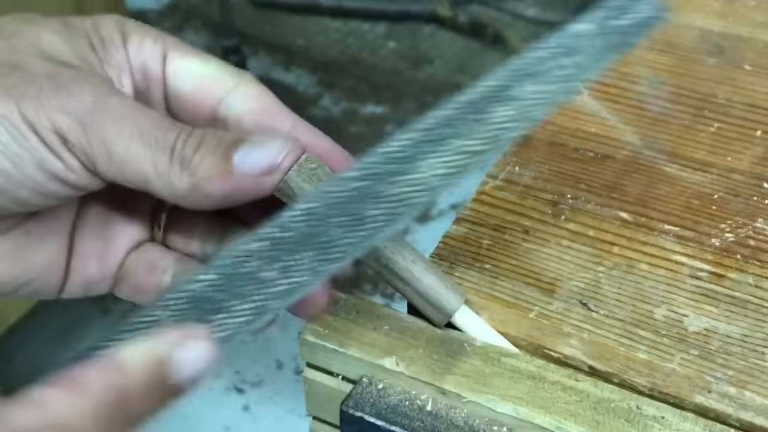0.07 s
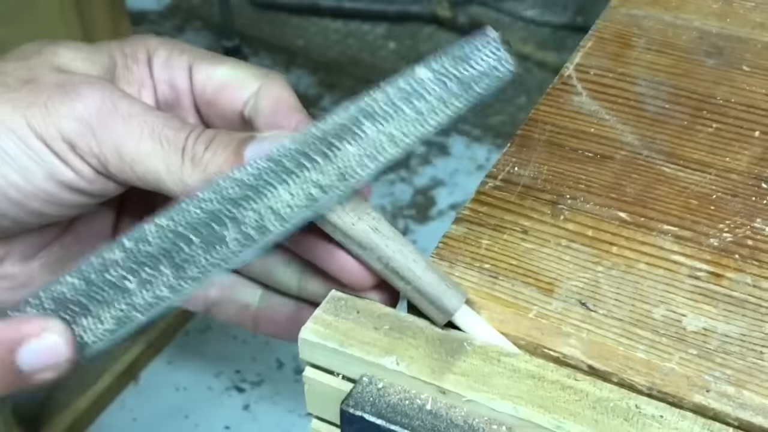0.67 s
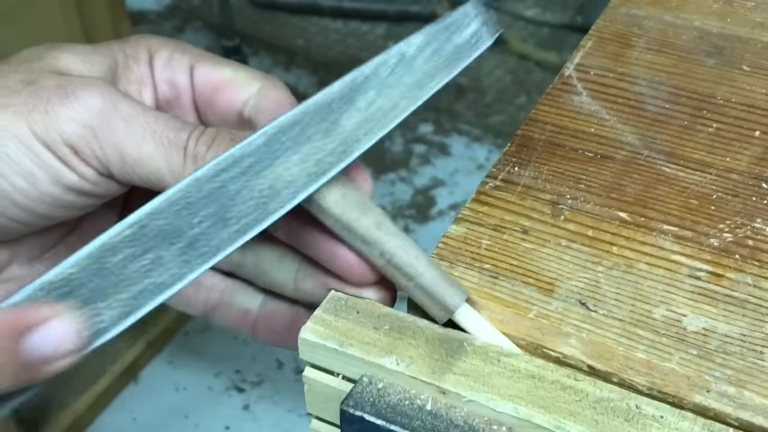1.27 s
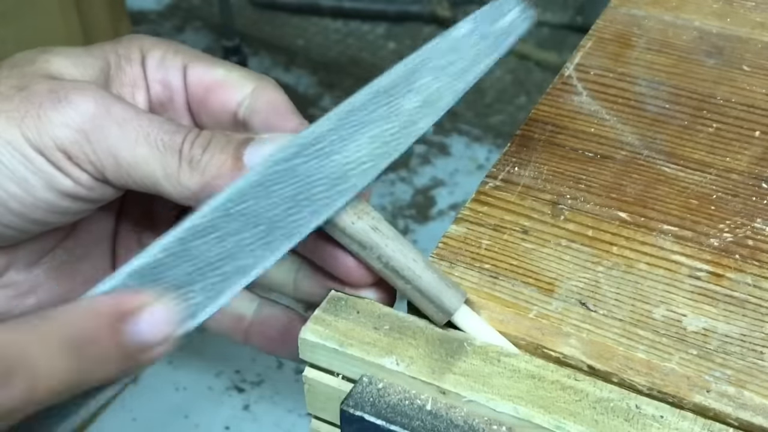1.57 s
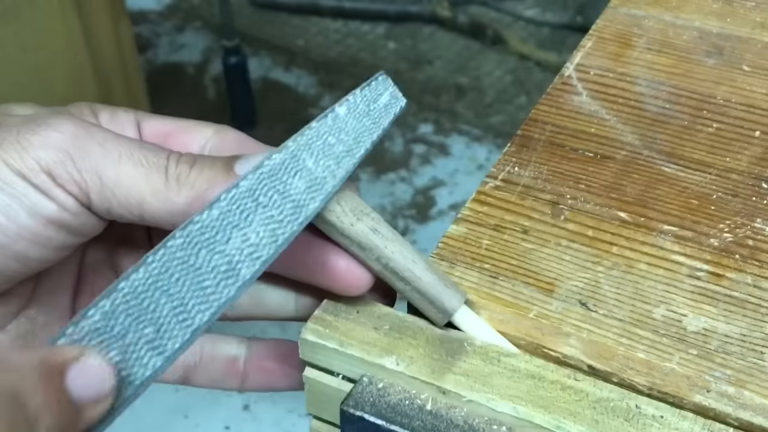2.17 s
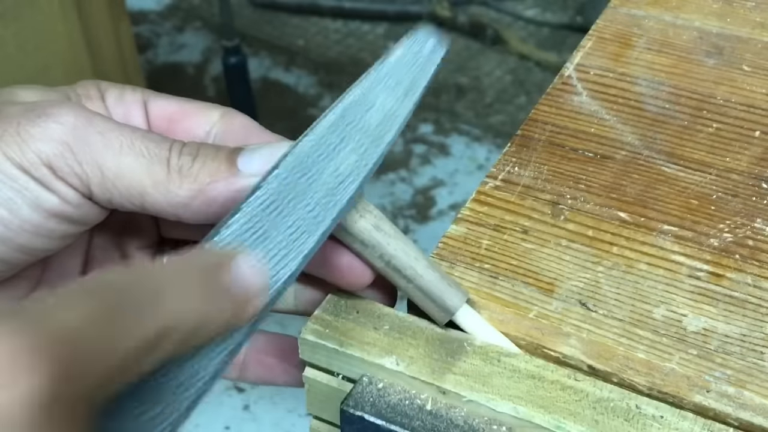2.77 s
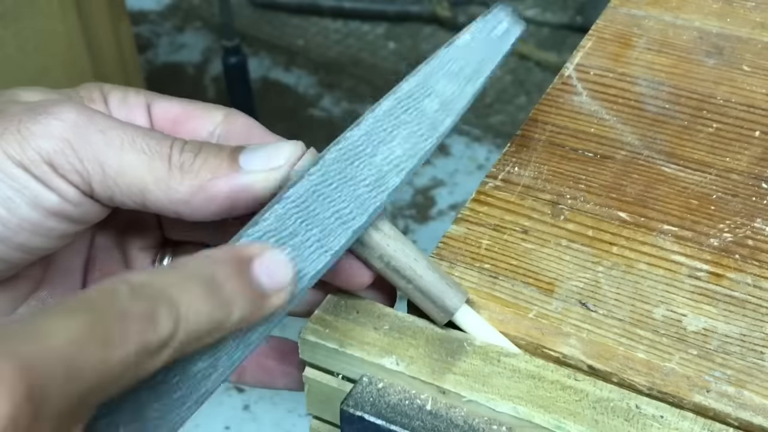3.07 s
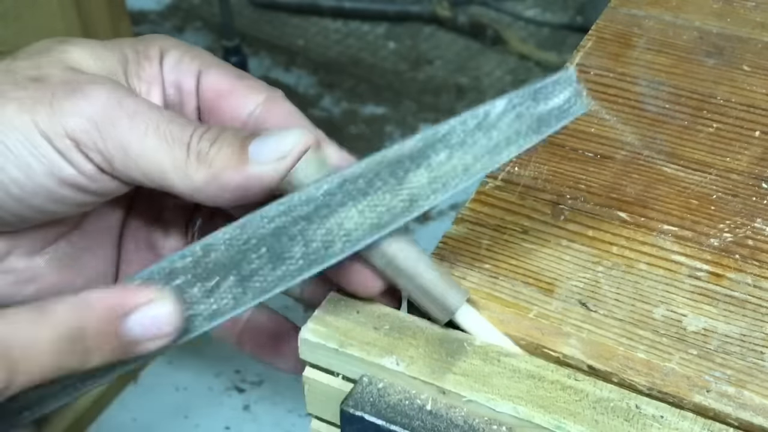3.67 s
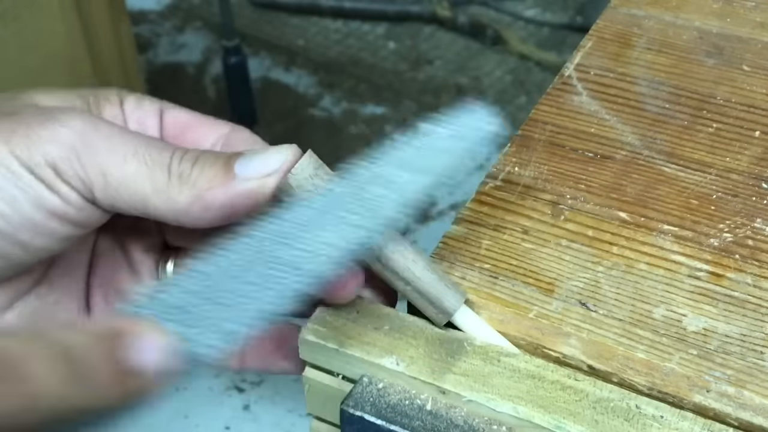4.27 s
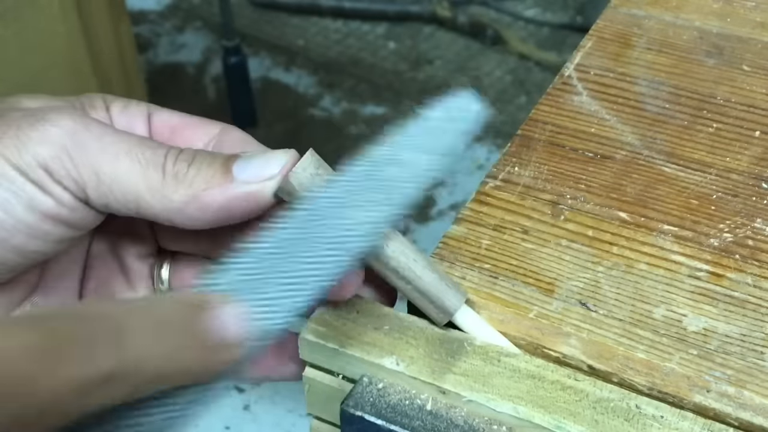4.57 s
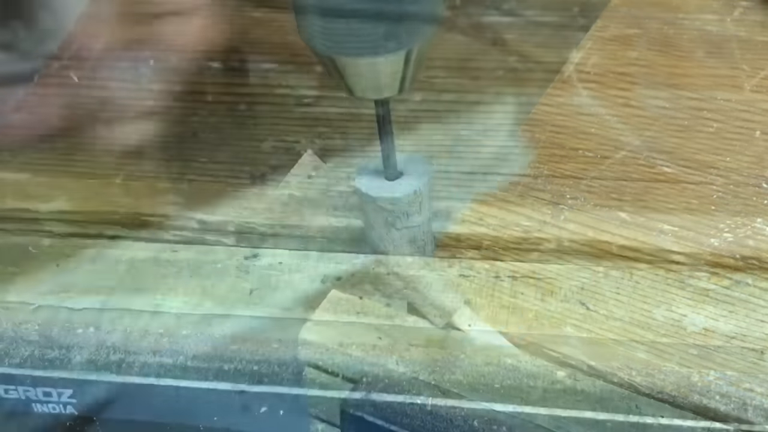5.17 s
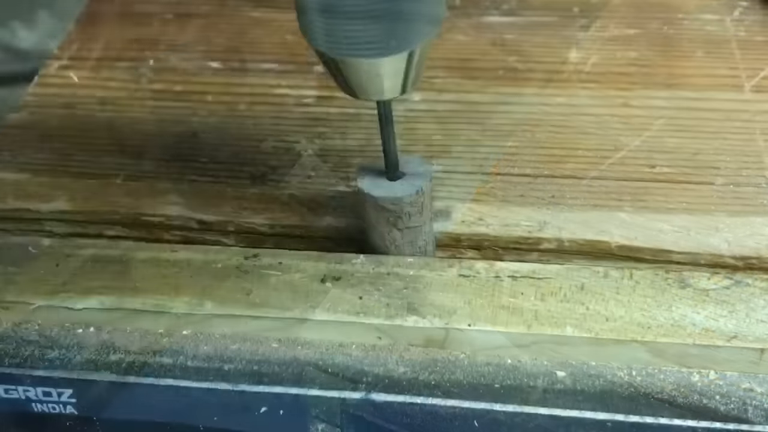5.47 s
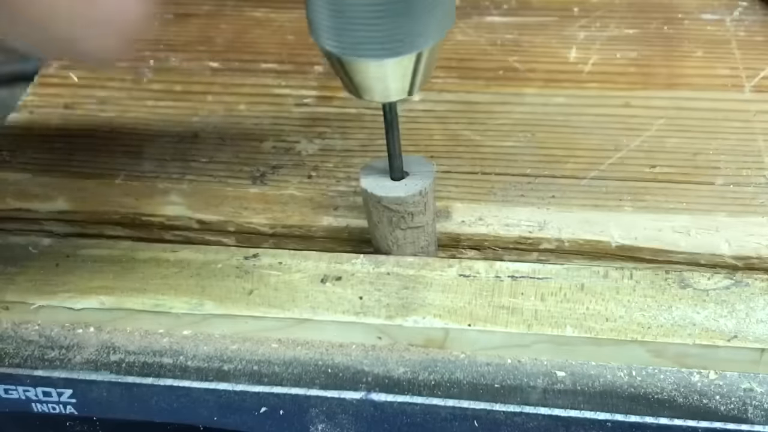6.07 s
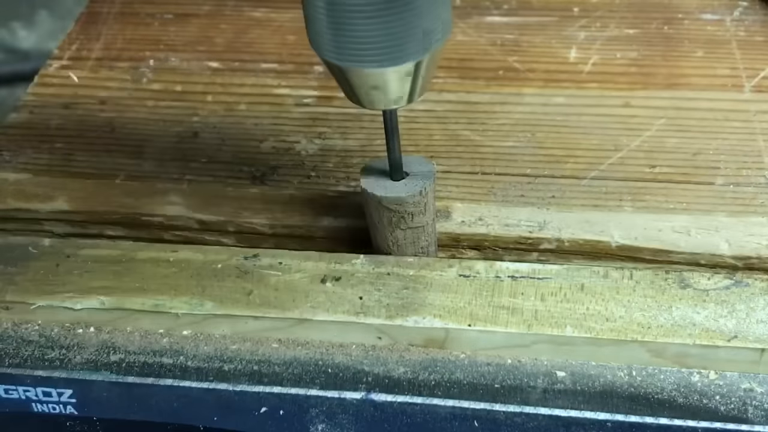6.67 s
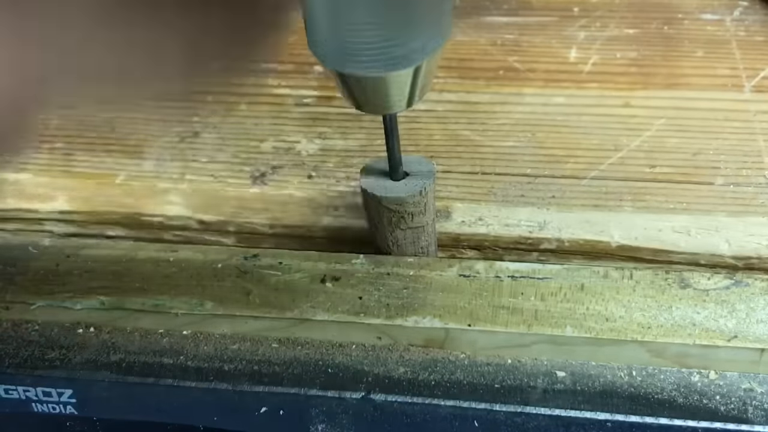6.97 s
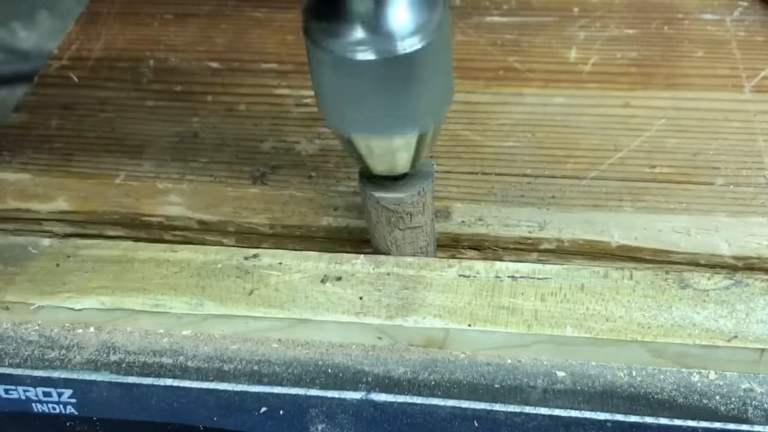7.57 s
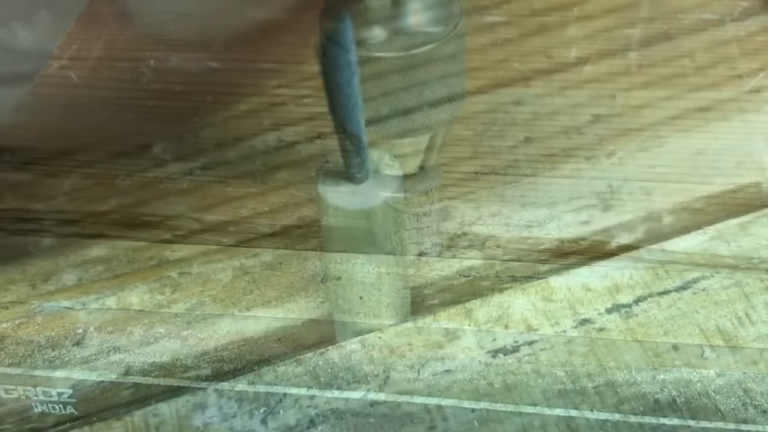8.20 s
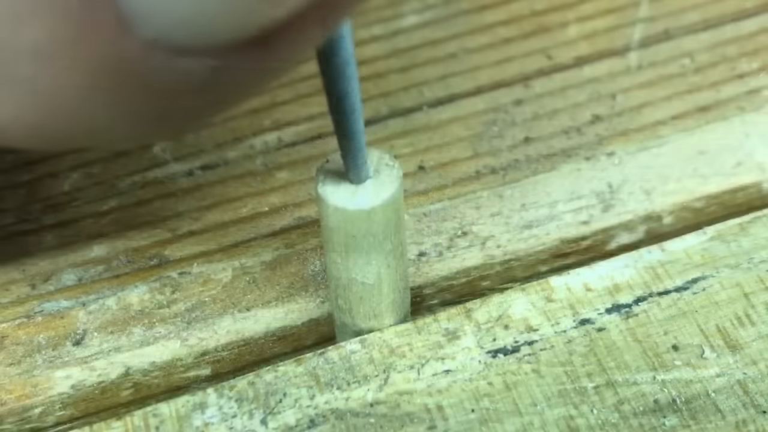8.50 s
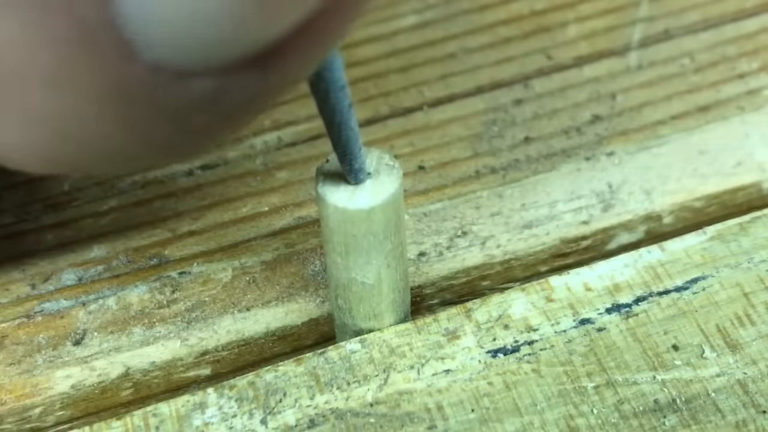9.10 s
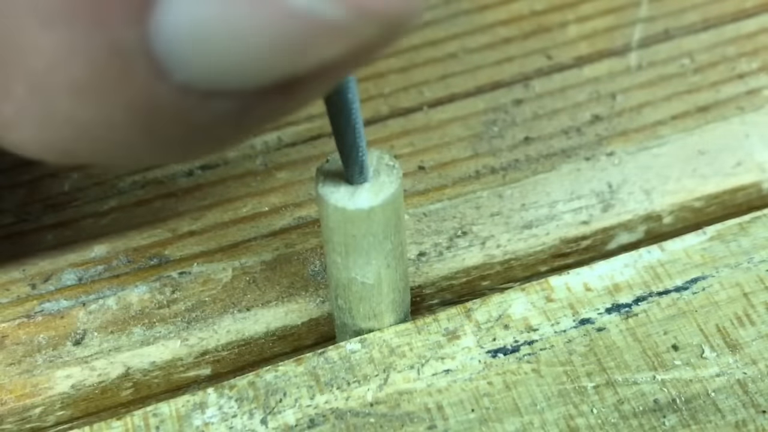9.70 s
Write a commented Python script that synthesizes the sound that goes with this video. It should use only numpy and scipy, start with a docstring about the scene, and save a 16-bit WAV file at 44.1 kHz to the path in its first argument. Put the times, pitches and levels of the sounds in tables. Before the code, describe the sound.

A metal file rasps quickly over a wooden dowel, then a drill bit creaks and squeals in the wood and finally scratches faintly.

```python
"""Close up in a small workshop, a metal file rasps to and fro over a dowel clamped in a wooden vice:
its teeth crush and snag the fibres and shake the vice, while a faint machine drone recedes.
From about 5 s a drill bit is twisted slowly into a dowel. It sticks and slips in creaking ticks and
squeals near 10-14 kHz as it binds; the bench takes a few soft bumps. Last, from about 8 s, a small
bit is twirled in the hole by hand, scratching faintly over a low hum."""
import sys
import numpy as np
from scipy import signal
from scipy.fft import rfft, irfft
from scipy.io import wavfile
from scipy.ndimage import uniform_filter1d

SR = 44100
rng = np.random.default_rng(int(sys.argv[2]) if len(sys.argv) > 2 else 0)


def materialize(psi):
    """Save the field psi as 16-bit PCM at rate SR to the path in sys.argv[1].

    A 1-D psi becomes a single channel; in a 2-D psi each row is a channel.
    """
    bounded = np.clip(np.atleast_2d(psi).T, -1, 1)
    quanta = np.round(bounded * 32767).astype(np.int16)
    wavfile.write(sys.argv[1], SR, quanta)


N = 433943
T = np.arange(N) / SR

# To-and-fro cycles of the file. Each row: start and length of the push in seconds, push level in dB,
# return level in dB (None where the file lifts off).
FILE_CYCLES = [(.331, 0.062, -48, -47), (.484, 0.066, -44.5, -45), (.636, .056, -40.5, -48.5),
               (.78, 0.057, -42, -51.5), (.92, 0.057, -40.5, -42.5), (1.063, 0.061, -38.5, -44),
               (1.208, 0.053, -38, -42.5), (1.358, 0.041, -41.5, -46), (1.484, 0.055, -38, -42),
               (1.626, 0.049, -40, -41), (1.761, 0.069, -37.5, None), (2.125, 0.068, -41, -44.5),
               (2.274, 0.055, -38, -42.5), (2.415, 0.054, -40, -41), (2.551, 0.052, -40.5, -41),
               (2.694, .046, -39.5, -40.5), (2.83, 0.051, -38.5, -39), (2.963, .06, -37.5, -38),
               (3.11, .062, -38, -38), (3.258, 0.071, -38.5, -42), (3.415, 0.071, -38, None),
               (3.702, 0.076, -43.5, -42.5), (3.858, 0.063, -41.5, -40.5), (4.003, 0.08, -41, None),
               (4.212, 0.094, -40, None), (4.412, 0.073, -37, -45.5), (4.575, .057, -36.5, -47),
               (4.717, 0.052, -38.5, None)]
# Turns of the drill, each a run of slips. Each row: start and end in seconds, slips per second,
# then the levels of the first slip, the last slip and the dust in dB.
DRILL_TURNS = [(5.003, 5.083, 65, -39, -45, -58), (5.11, 5.206, 40, -73, -56, -58),
               (5.213, 5.3337, 57, -38, -39, -59.5), (5.446, 5.571, 32, -50.5, -39.5, -61),
               (5.654, 5.775, 53, -47.5, -47.5, -64), (6.02, 6.049, 36, -56, -39, -53.5),
               (6.0686, 6.1466, 78, -28.5, -33, -49), (6.374, 6.455, 72, -35.5, -39, -63),
               (6.4707, 6.5402, 72, -38, -38.5, -79), (6.6635, 6.7004, 76, -34.5, -44, -55.5),
               (6.801, 6.846, 43, -50.5, -38.5, -66), (7.07, 7.338, 45, -44, -51.5, -62.5),
               (7.3534, 7.4913, 43, -40, -39.5, -55.5), (7.5098, 7.609, 68, -30, -34, -57),
               (7.6212, 7.6705, 100, -28, -34.5, -61)]


def filing():
    """The deeper the teeth bite, the coarser the rasp and the lower and harder the vice shakes."""
    # Colours of cutting teeth, sliding teeth and the dowel. Each row: frequency in Hz, level in dB.
    cutting = [(200, -44), (3400, -23), (4300, -7.5), (5100, 4), (5600, -2), (6400, -4), (7100, -3),
               (8400, 2.5), (9200, -4), (9700, -10), (10400, -3), (11100, -12), (11650, -5), (12600, -21),
               (15600, -14)]
    sliding = [(200, -122), (3400, -10.5), (4300, -2.5), (5000, 4.5), (6200, -1), (7200, 7.5), (8450, 10),
               (9100, 3), (9800, -22), (10600, -13), (14000, -18), (15600, -17)]
    dowel = [(60, -49), (500, -20), (950, -10), (1300, -3.5), (1420, -6.5), (1520, 5.5), (1620, -4.5),
             (1720, 0.5), (2400, 0), (3300, -2), (4000, -12), (5000, -35)]
    # Modes of the vice and bench. Each row: frequency in Hz, level in dB, ring time in seconds.
    vice_modes = [(150.5, -12, 0.23), (243, -15.5, 0.091), (315.3, -10.5, 0.12), (374.6, -5, 0.08),
                  (412, -4.5, 0.074), (466, -6, 0.069), (546.5, -8, 0.09), (624, -3, 0.067), (684, 2, 0.11),
                  (722.7, 3.5, 0.16), (838, -7, 0.043)]
    # A tooth catches hard and tears a fibre. Each row: time in seconds, strength in dB.
    catches = [(0.0897, -26.5), (0.2728, -31), (0.3661, -12), (0.5736, -17.5), (0.6394, -19),
               (0.6499, -11.5), (0.7866, -15), (1.0645, -25), (1.3598, -17), (1.3853, -7.5),
               (2.2842, -12.5), (2.56, -17), (2.6943, -17), (3.685, -20.5), (4.0344, -12.5),
               (4.0632, -12.5), (4.2168, -13.5), (4.3854, -23), (4.4149, -15.5), (4.4692, -17.5),
               (4.6109, -14.5), (4.7292, -12.5)]
    out, vice = np.zeros((2, N))
    lead_s = .004  # the file touches just before it gets up to speed
    for start, end, bite, teeth_db, dowel_db, vice_db in file_strokes():
        force = rasp(start, end, tooth_hz=600 * np.exp(-.5 * bite), scatter_db=5, grit_db=-1 - 3.7 * bite,
                     crush_s=.0038, power=1.15 * np.exp(-.55 * bite), lead_s=lead_s)
        steel = shifted(blend(sliding, cutting, bite), spread=.014, uneven_db=2.5)
        wood = shifted(dowel, spread=.045, uneven_db=2)
        modes = [(hz, db + 2 * (bite - .5) * np.log2(700 / hz) + 2 * rng.standard_normal(), t60)
                 for hz, db, t60 in vice_modes]
        add(out, start - lead_s, amp(teeth_db) * signal.fftconvolve(force, steel))
        add(out, start - lead_s, amp(dowel_db) * signal.fftconvolve(force, wood))
        add(vice, start - lead_s, amp(vice_db + 9.5 * bite) * signal.fftconvolve(force, ring(modes)))
    snaps = cracks(catches + snags(), t60=.0097, splinters=.69)
    caught = amp(10.5) * through(snaps, colour(cutting)) + amp(.5) * through(snaps, colour(dowel))
    vice += amp(-8) * through(snaps, ring(vice_modes))
    jam_s, shove = 1.383, swell(int(.0065 * SR), power=2.3)  # once the file jams and shoves the vice
    add(vice, jam_s, amp(-31) * signal.fftconvolve(shove, ring(vice_modes)))
    low_cut = signal.butter(4, 110, "high", fs=SR, output="sos")  # a small vice radiates no deep bass
    return out + caught + signal.sosfilt(low_cut, vice)


def file_strokes():
    """Pushes dig in, returns slide back. Yields start, end, bite and teeth, dowel and vice levels."""
    # How the file is held. Each row: time in seconds, bite of the push from 0 to 1, then three
    # offsets from the dowel's level in dB: teeth on the push, teeth on the return, vice.
    hold = [(.35, 0.56, 6.5, 10.5, -6), (.9, 0.44, 5, 8.5, -13), (1.23, 0.39, 2, 11.5, -8),
            (1.38, 0.96, -1, 6.5, -9), (1.52, 0.85, 6.5, 13.5, -11), (2.15, 0.93, 5, 10.5, -12.5),
            (2.5, 0.89, 9.5, 10, -9), (2.98, .9, 8, 6.5, -10), (3.3, .92, 0.5, 0.5, -15),
            (4.0, .9, 5.5, 2, -13.5), (4.45, 0.93, 0, -2, -13), (4.75, 0.94, 4.5, 12, -11.5)]
    turn_s, restart_s = .015, .016  # rests before the return and before the next push
    return_bite = .15
    for k, (start, length, push_db, return_db) in enumerate(FILE_CYCLES):
        end = start + length
        bite, push_teeth_db, return_teeth_db, vice_db = curve(hold, start + length / 2)
        yield start, end, bite, push_db + push_teeth_db, push_db, push_db + vice_db
        if return_db is not None:
            next_push = FILE_CYCLES[k + 1][0]
            yield (end + turn_s, next_push - restart_s, return_bite,
                   return_db + return_teeth_db, return_db, return_db + vice_db)


def snags():
    """Somewhere in every push a tooth snags a fibre. Returns times and strengths."""
    over_push_db, scatter_db = 17.5, 2.5
    chance = rng.uniform(-1, 1, (len(FILE_CYCLES), 2))
    return [(start + length * (.5 + .35 * place), db + over_push_db + scatter_db * size)
            for (start, length, db, _), (place, size) in zip(FILE_CYCLES, chance)]


def brushing():
    """As it is placed for a bout, the file skims the wood without cutting."""
    # Light touches. Each row: start and end in seconds, level in dB.
    touches = [(0, 0.116, -45), (0.116, 0.24, -58), (1.85, 2.135, -63.5), (3.501, 3.67, -63)]
    # Their colour. Each row: frequency in Hz, level in dB.
    skim = [(400, -9), (1500, -4), (4000, -1.5), (8500, 3), (10000, -1.5), (15500, -4)]
    out = np.zeros(N)
    for start, end, db in touches:
        force = rasp(start, end, tooth_hz=592, scatter_db=14, grit_db=8,
                     crush_s=.0016, power=.99, lead_s=.009)
        add(out, start, amp(db) * force)
    return through(out, colour(skim))


def creaking():
    """Each slip of the bit knocks the wood and, if hard, rings the steel; dust grinds in between."""
    # Single jolts of the bit in the hole. Each row: time in seconds, strength in dB.
    jolts = [(4.9496, -53), (5.355, -37.5), (5.3697, -34), (5.38, -35), (5.401, -33.5), (6.0764, -32.5),
             (6.131, -27), (6.1697, -39.5), (6.3512, -41.5), (6.3879, -31), (6.561, -46.5), (7.3857, -31.5),
             (7.5245, -32.5), (7.644, -32), (7.8005, -48)]
    # Colours of creaking wood and of dust hissing on steel. Each row: frequency in Hz, level in dB.
    creak = [(220, -17.5), (350, -10), (460, -14.5), (800, -11.5), (1100, -3.5), (1450, -5.5), (1650, -0.5),
             (1860, 5), (2300, -4.5), (2900, 2.5), (3500, -1), (3900, -3), (4800, -9.5), (7400, -14.5),
             (9300, -5.5), (10600, -22), (15500, -31.5)]
    hiss = [(3500, -18.5), (5700, -2), (6900, -15.5), (8000, 1.5), (8750, 3), (10000, -4), (10800, -12.5),
            (11850, -4), (12400, -11), (13500, -7), (15500, -11.5)]
    # Modes of the bit and chuck, and of the clamped dowel, which hums on between slips.
    # Each row: frequency in Hz, level in dB, ring time in seconds.
    bit_modes = [(8620, 3.5, 0.036), (9340, -3, 0.015), (9700, -16.5, 0.076), (11850, -8.5, .09),
                 (12940, -6.5, .04), (13060, -9.5, .04), (14220, -15, .05), (15180, -13.5, .04)]
    dowel_modes = [(328, -3, 0.16), (349.7, 0, 0.18), (380.6, -4.5, .1)]
    ticks = jolts + list(slips())
    wood = amp(19.5) * cracks(ticks, t60=.008, splinters=.36)
    wood += amp(13) * cracks(ticks, t60=.05, splinters=1)
    accented = [(s, db + .2 * (db + 33)) for s, db in ticks]
    steel = amp(13) * cracks(accented, t60=.008, splinters=.36)
    dust = np.zeros(N)
    margin_s = .016  # the bit grinds a little before and after it creaks
    for start, end, _, first_db, last_db, dust_db in DRILL_TURNS:
        force = rasp(start - margin_s, end + margin_s, tooth_hz=504, scatter_db=3, grit_db=0,
                     crush_s=.003, power=.46, lead_s=.004)
        grind_db = -55 + 1.1 * ((first_db + last_db) / 2 + 34.5)  # harder slips, louder grinding
        add(wood, start - margin_s, amp(grind_db) * force)
        add(dust, start - margin_s, amp(dust_db) * force * amp(2 * walk(40, len(force))))
    body = through(wood, colour(creak)) + amp(-15.5) * through(wood, ring(dowel_modes))
    return body + through(steel, ring(bit_modes)) + through(dust, colour(hiss))


def slips():
    """The bit sticks and slips almost evenly, softer at a turn's ends. Yields times and strengths."""
    jitter_s, ease_db = .0008, 1.5
    chances = rng.standard_normal((len(DRILL_TURNS), 40, 2))
    for (start, end, rate, first_db, last_db, _), chance in zip(DRILL_TURNS, chances):
        progress = np.linspace(0, 1, round((end - start) * rate) + 1)
        for along, (late, scatter_db) in zip(progress, chance):
            db = first_db + along * (last_db - first_db) - ease_db * (2 * along - 1) ** 2
            yield start + along * (end - start) + jitter_s * late, db + scatter_db


def squealing():
    """Fast stick-slip sings wavering tones; up high it keeps losing grip, sags and rings the chuck."""
    # Short squeaks. Each row: start and end in seconds, first and last pitch in Hz, level in dB.
    squeaks = [(4.994, 5.0, 13910, 13800, -45), (5.384, 5.405, 7100, 8800, -39),
               (5.527, 5.545, 9750, 9900, -10.5), (5.55, 5.561, 9450, 10080, -10.5),
               (5.614, 5.62, 9880, 9850, -19.5), (5.635, 5.641, 8890, 8820, -10),
               (6.053, 6.062, 9070, 8800, -28.5), (6.841, 6.865, 10000, 9400, -13.5),
               (6.926, 6.933, 10440, 10110, -22), (7.05, 7.06, 10150, 10100, -16.5),
               (7.13, 7.153, 11850, 11850, -15), (7.531, 7.543, 4100, 4700, -34.5)]
    # Two long squeals that climb as the bit binds, one curve each.
    # Each row of a curve: time in seconds, pitch in Hz, level in dB.
    squeals = [
        [(5.672, 9950, -7.5), (5.69, 10000, -9.5), (5.697, 10000, -20), (5.713, 10000, -15),
         (5.717, 10000, -4.5), (5.735, 10030, -14.5), (5.748, 10050, -13), (5.752, 11400, -13.5),
         (5.77, 11600, -13.5), (5.788, 11900, -9)],
        [(6.937, 10950, -33.5), (6.972, 11360, -24), (6.984, 11130, -46), (6.998, 11500, -22),
         (7.028, 12100, -23), (7.055, 11400, -28), (7.063, 13100, -12.5), (7.1, 13300, -18.5),
         (7.115, 13900, -13), (7.165, 12700, -21), (7.212, 13400, -33)],
    ]
    # Modes of the chuck. Each row: frequency in Hz, level in dB, ring time in seconds.
    chuck_modes = [(8630, -1.5, .03), (10050, -1.5, .0698), (10440, -6.5, .036), (11780, -1, .066),
                   (13200, -7, .06), (13500, -10, .0594), (14160, -5.5, .035)]
    tone, screech = np.zeros((2, N))
    attack_s, grip_losses_per_s = .0024, 71
    glides = [[(start, first_hz, db), (end, last_hz, db)] for start, end, first_hz, last_hz, db in squeaks]
    for rows in glides + squeals:
        start = rows[0][0] - attack_s / 2
        length = max(rows[-1][0] - rows[0][0], attack_s) + attack_s
        count = int(length * SR)
        hz, db = curve(rows, start + T[:count])
        rough = np.interp(hz, [11900, 13000], [.2, 1])
        twist = np.cumsum(grip_losses_per_s * np.exp(.3 * walk(90, count))) / SR % 1
        sag = uniform_filter1d(twist ** 4, size=48)  # droops ever faster until the bit grips again
        sag_depth = np.interp(hz, [10100, 11200, 13000], [.01, .06, .11])
        waver = .004 * walk(450, count) + rough * (.02 + .012 * walk(130, count))
        whistle = np.sin(2 * np.pi * np.cumsum(hz * (1 + waver - sag_depth * sag)) / SR)
        flutter = amp(4 * walk(310, count) - 4 * sag)
        grip = amp(db) * unit(signal.windows.tukey(count, 2 * attack_s / length) * flutter)
        add(tone, start, grip * unit(whistle))
        add(screech, start, rough * grip * unit(whistle * walk(1800, count)))
    direct = amp(-.55) * tone + amp(-10) * screech
    chuck = through(amp(-24) * tone + amp(-5.5) * screech, ring(chuck_modes))
    return signal.sosfilt(signal.butter(4, [3500, 15000], "band", fs=SR, output="sos"), direct + chuck)


def twirling():
    """The hand-held bit scrapes dust from the hole, each twist at a slightly new angle."""
    # Twists of the bit. Each row: start and end in seconds, level in dB.
    twists = [(7.868, 8.018, -68.5), (8.072, 8.148, -63.5), (8.202, 8.278, -60), (8.32, 8.413, -63),
              (8.458, 8.527, -56.5), (8.569, 8.664, -63), (8.699, 8.772, -55.5), (8.814, 8.913, -61.5),
              (8.925, 9.016, -56.5), (9.158, 9.425, -63.5), (9.445, 9.576, -65), (9.598, 9.753, -62),
              (9.735, 9.84, -67)]
    # Colours of the scratch and of the wood under it. Each row: frequency in Hz, level in dB.
    scratch = [(3000, -20), (4300, -5.5), (5200, -1), (6100, 4.5), (7000, -2.5), (8100, 8.5), (9000, -4.5),
               (11500, -4.5), (15500, -3.5)]
    wood = [(500, 2.5), (1200, -9), (1600, 6.5), (1950, -9.5), (2380, 12.5), (2900, -2.5), (3800, 0.5),
            (5500, -20)]
    # Crumbs snap under the bit. Each row: time in seconds, strength in dB.
    crumbs = [(8.1694, -56), (8.4244, -48.5), (8.6277, -38), (8.6867, -46.5), (8.745, -30), (8.8019, -48),
              (8.8966, -35), (9.071, -43), (9.1025, -40.5), (9.2434, -37), (9.6058, -45), (9.8066, -45)]
    out = np.zeros(N)
    for start, end, db in twists:
        force = rasp(start, end, tooth_hz=673, scatter_db=1, grit_db=3.5,
                     crush_s=.0028, power=1, lead_s=.0023)
        wood_db = -65.5 + .6 * (db + 62.5)  # the wood swells less than the scratch
        add(out, start, amp(db) * signal.fftconvolve(force, shifted(scratch, .025, uneven_db=3)))
        add(out, start, amp(wood_db) * signal.fftconvolve(force, shifted(wood, .025, uneven_db=2.5)))
    snaps = cracks(crumbs, t60=.01, splinters=.42)
    return out + amp(10) * through(snaps, colour(scratch)) + amp(9.5) * through(snaps, colour(wood))


def bench_bumps():
    """The heavy bench answers a nudge with a dull thud."""
    # Soft nudges. Each row: time in seconds, strength in dB.
    nudges = [(6.421, -40), (7.66, -36), (7.69, -45), (8.746, -38)]
    # Modes of the bench. Each row: frequency in Hz, level in dB, ring time in seconds.
    bench_modes = [(47.6, -14, .15), (74.4, -2, .13), (125, -5, .05)]
    push = np.zeros(N)
    for s, db in nudges:
        add(push, s, amp(db) * unit(swell(int(.008 * SR), power=2)))
    return amp(-24.5) * through(push, ring(bench_modes))


def machine_drone():
    """The wavering tones of a faint machine recede while the filing goes on."""
    # Tones of the drone. Each row: frequency in Hz, opening level in dB.
    partials = [(86, -65.5), (129, -65), (172, -63), (215, -68), (247.6, -61), (344.5, -67.5)]
    tones = np.zeros(N)
    for hz, db in partials:
        level = amp(db + 2 * walk(9))
        phase = 2 * np.pi * np.cumsum(hz * (1 + .011 * walk(13))) / SR
        tones += level * unit(np.sin(phase))
    return tones * amp(np.interp(T, [0, 1.4, 2.1, 4.7, 5.3], [0, -3.5, -5, -51, -44.5]))


def workshop_air():
    """Soft room tone whose colour crossfades from one job to the next."""
    # Colours of the air during each job. Each row: frequency in Hz, level in dB.
    filing_air = [(30, -45), (55, -24), (85, 0), (150, 2), (260, -1), (700, -11), (1000, -19), (2800, -29),
                  (5200, -27), (8500, -28), (11000, -35), (16000, -37)]
    drilling_air = [(20, -20), (50, 0), (100, 0), (200, -5), (345, -4), (500, -13), (1000, -17),
                    (1900, -21), (5500, -27), (7500, -31), (8800, -26), (10500, -33), (16000, -37)]
    twirling_air = [(18, -15), (30, -22), (66, 2.5), (287, -17.5), (844, -20.5), (1250, -26), (1630, -27),
                    (1860, -32), (2410, -25), (3140, -31.5), (14000, -38), (16000, -38)]
    to_drill, to_twirl = np.interp(T, [4.8, 5.3], [0, 1]), np.interp(T, [7.6, 8.1], [0, 1])
    jobs = [(filing_air, amp(-58.5) * np.sqrt(1 - to_drill)),
            (drilling_air, amp(-57) * np.sqrt(to_drill * (1 - to_twirl))),
            (twirling_air, amp(-60) * np.sqrt(to_twirl))]
    air = sum(gain * through(rng.standard_normal(N), colour(points)) for points, gain in jobs)
    return air * amp(.7 * walk(8.1))


def low_hum():
    """A hum wavering around 49 Hz creeps in under the drilling and stays to the end."""
    # Its rise. Each row: time in seconds, level in dB.
    rise = [(4.5, -105), (4.9, -93), (5.3, -78), (7.7, -65), (8.0, -63), (8.7, -55), (9.8, -55)]
    phase = 2 * np.pi * np.cumsum(49 + 2 * walk(4.3)) / SR
    hum = unit(np.sin(phase) * amp(2.7 * walk(9)))
    return hum * amp(curve(rise, T)[0])


def room(x, t60, wet_db, treble_db):
    """A diffuse tail from the nearby walls, arriving after 5 ms."""
    decay = fade(t60)
    tail = decay * rng.standard_normal(2 * SR)[:len(decay)]
    tail[:int(.005 * SR)] = 0
    tail = signal.fftconvolve(tail, colour([(200, 12.5), (1500, 5), (8000, -7.5), (12000, treble_db)]))
    return amp(wet_db) * through(x, tail / np.linalg.norm(tail))


def rasp(start, end, tooth_hz, scatter_db, grit_db, crush_s, power, lead_s):
    """Force of one stroke: teeth strike at a rate set by hand speed, crushing fibres, over fine grit."""
    count = int(max(end - start + lead_s, .01) * SR)
    speed = swell(count, power)
    teeth_passed = np.cumsum(tooth_hz * np.sqrt(speed) * np.exp(.35 * walk(300, count))) / SR
    at = np.flatnonzero(np.diff(np.floor(teeth_passed)))
    strikes = np.zeros(count)
    strikes[at] = amp(scatter_db * np.clip(rng.standard_normal(len(at)), -1.5, 1.5))
    crush = signal.fftconvolve(strikes, fade(crush_s))[:count] * rng.standard_normal(count)
    grit = amp(grit_db + 2 * walk(900, count)) * rng.standard_normal(count)
    return unit(speed * (unit(crush) + grit))


def cracks(events, t60, splinters):
    """For each time and strength, one sharp snap and a short spray of splinters."""
    snaps = np.zeros(N)
    for s, db in events:
        add(snaps, s, amp([db]))
    spray = splinters * fade(t60)
    return (snaps + through(snaps, spray) * rng.standard_normal(N)) / np.sqrt(1 + np.sum(spray ** 2))


def swell(count, power):
    """Speed of a hand stroke, from rest to rest."""
    return np.sin(np.pi * (np.arange(count) + .5) / count) ** power


def ring(modes):
    """A struck body's response: decaying sines, with unit energy in all."""
    t = T[:SR // 5]
    response = np.zeros(len(t))
    for hz, db, t60 in modes:
        decay = amp(db) / np.sqrt(t60) * np.exp(-np.log(1000) * t / t60)
        response += decay * np.sin(2 * np.pi * hz * t + rng.uniform(0, 2 * np.pi))
    return response / np.linalg.norm(response)


def colour(points, size=4096):
    """Minimum-phase response of unit energy that follows an EQ curve."""
    hz, db = np.transpose(sorted(map(tuple, points)))
    bins_hz = np.maximum(np.fft.rfftfreq(size, 1 / SR), 1)
    cepstrum = irfft(np.log(amp(np.interp(np.log(bins_hz), np.log(hz), db))))
    cepstrum[1:size // 2] *= 2
    cepstrum[size // 2 + 1:] = 0
    response = irfft(np.exp(rfft(cepstrum)))
    return response / np.linalg.norm(response)


def shifted(points, spread, uneven_db):
    """The same colour from a new contact point: resonances move a little and change their balance."""
    hz, db = np.transpose(points)
    hz = hz * np.exp(spread * rng.standard_normal())
    db = db + uneven_db * rng.standard_normal(len(db))
    return colour(zip(hz, db))


def blend(first, second, share):
    """Morph one EQ curve the given share of the way into another."""
    curves = np.transpose(first), np.transpose(second)
    hz = np.union1d(curves[0][0], curves[1][0])
    from_db, to_db = (np.interp(np.log(hz), np.log(f), db) for f, db in curves)
    return np.transpose([hz, from_db + share * (to_db - from_db)])


def curve(rows, s):
    """The columns of a control curve at time s."""
    times, *columns = np.transpose(rows)
    return [np.interp(s, times, column) for column in columns]


def walk(rate, count=N):
    """Random wandering with rate turns a second, spread near 1."""
    at = np.arange(count) * rate / SR
    knots = rng.standard_normal(int(at[-1]) + 2)
    return np.interp(at, np.arange(len(knots)), knots)


def fade(t60):
    """An exponential decay, 60 dB long."""
    return np.exp(-np.log(1000) * T[:int(t60 * SR) + 2] / t60)


def through(x, response):
    """Play a track through a response."""
    return signal.fftconvolve(x, response)[:N]


def add(track, s, x):
    """Mix x into the track from time s."""
    i = max(int(s * SR), 0)
    track[i:i + len(x)] += x[:N - i]


def amp(db):
    """Gain from decibels."""
    return 10 ** (np.asarray(db) / 20)


def unit(x):
    """Scale to an RMS of 1."""
    return x / np.sqrt(np.mean(x ** 2) + 1e-20)


def scene():
    """The three jobs, one after another, in a small room."""
    work = filing() + brushing() + creaking() + twirling()
    squeal = squealing()
    walls = room(work, t60=.33, wet_db=-16, treble_db=-6.5)
    walls += room(squeal, t60=.49, wet_db=-18.5, treble_db=-13.5)
    background = bench_bumps() + machine_drone() + workshop_air() + low_hum()
    return (work + squeal + walls + background)[None]


def record(dry):
    """An oversampled soft clip rounds only the loudest peaks; a steep low-pass cuts the top."""
    ceiling, top_hz = .8, 15900
    fine = signal.resample_poly(dry, 4, 1, axis=1)
    rounded = signal.resample_poly(fine / (1 + (fine / ceiling) ** 6) ** (1 / 6), 1, 4, axis=1)
    return signal.sosfilt(signal.ellip(10, .2, 80, top_hz, fs=SR, output="sos"), rounded)


dry = scene()
out = record(dry)
materialize(out)
```